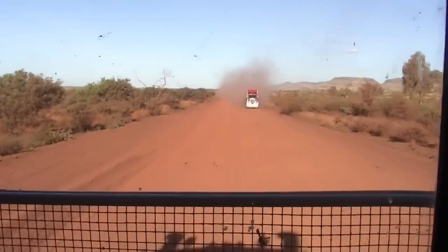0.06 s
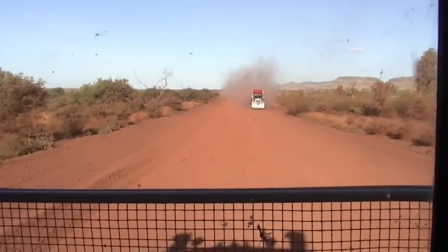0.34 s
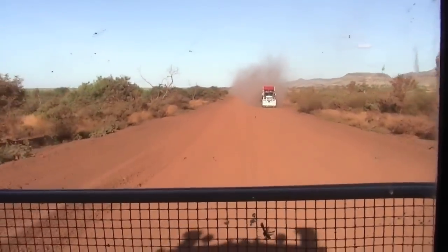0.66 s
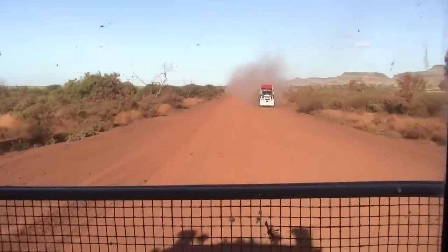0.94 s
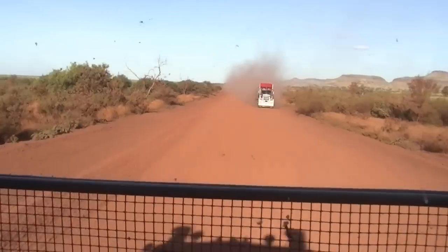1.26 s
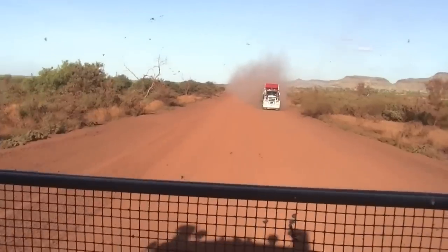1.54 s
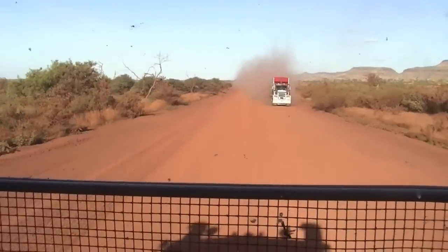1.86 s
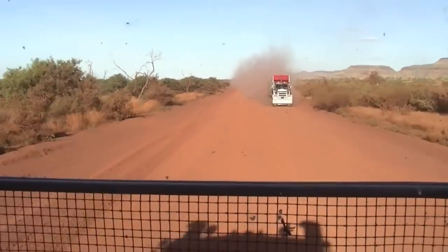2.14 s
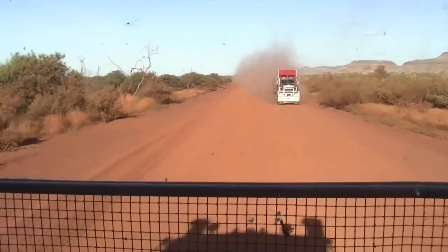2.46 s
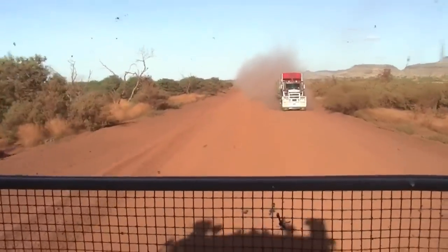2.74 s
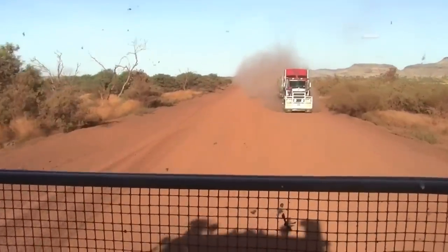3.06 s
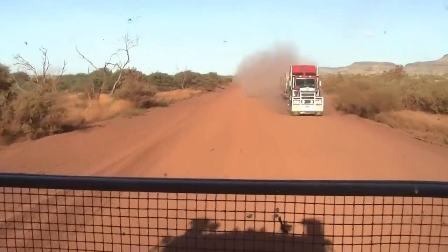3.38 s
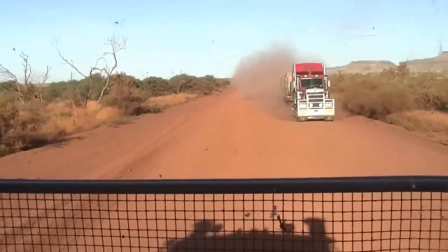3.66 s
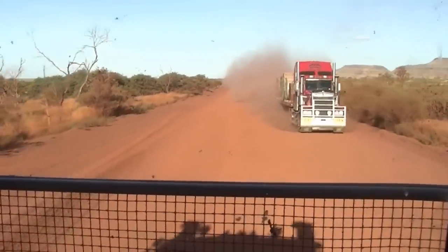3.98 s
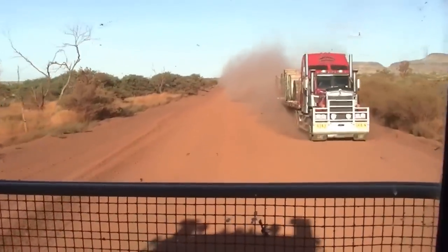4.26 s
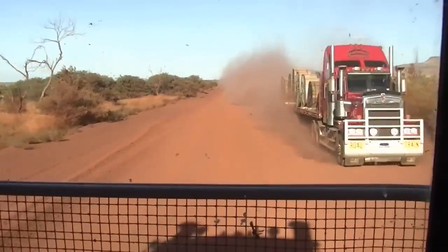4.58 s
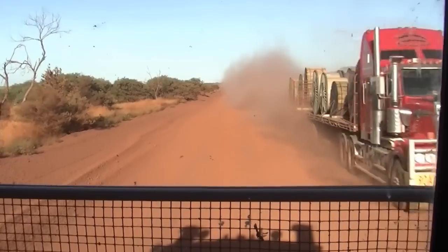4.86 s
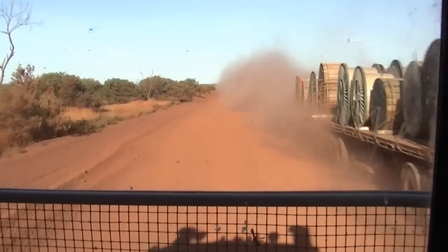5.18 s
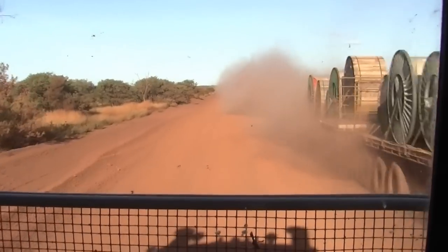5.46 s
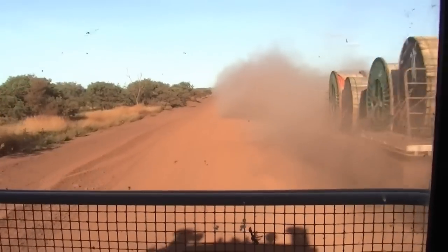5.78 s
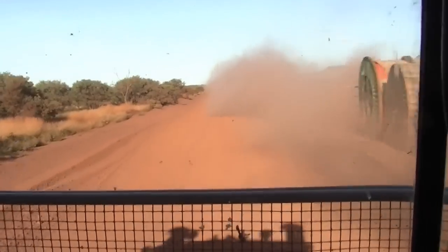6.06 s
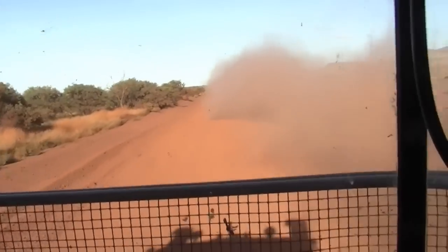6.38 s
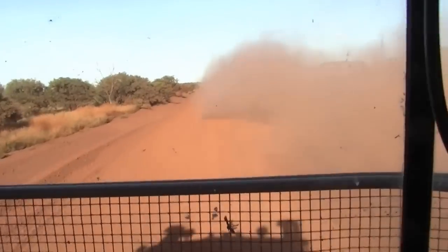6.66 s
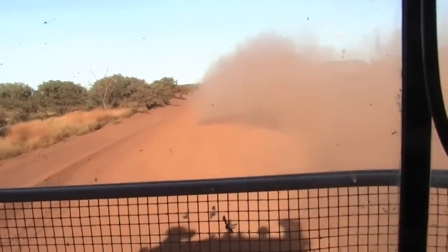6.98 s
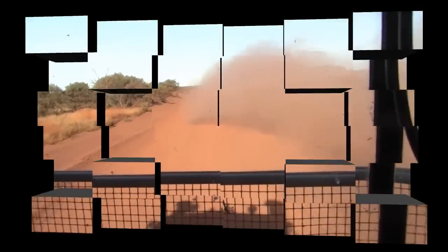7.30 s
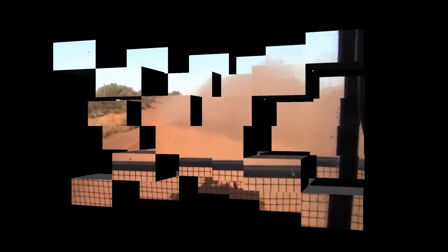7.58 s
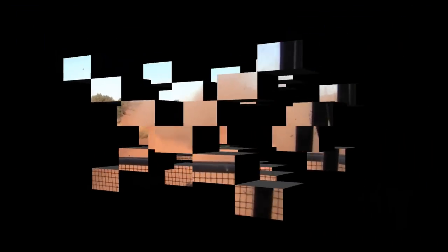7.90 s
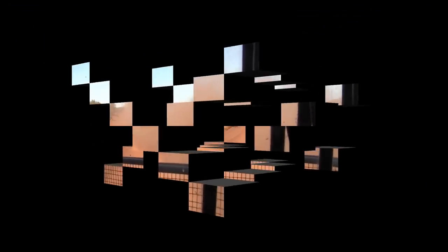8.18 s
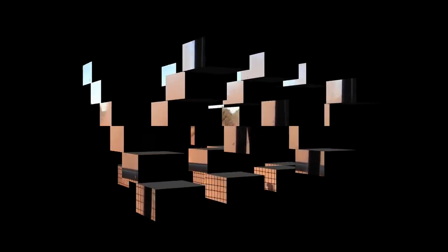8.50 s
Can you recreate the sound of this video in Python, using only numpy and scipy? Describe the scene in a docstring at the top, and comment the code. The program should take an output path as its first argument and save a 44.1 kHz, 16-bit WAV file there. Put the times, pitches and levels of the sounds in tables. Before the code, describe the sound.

Inside a diesel four-wheel drive on a dirt road, engine and tyres drone as a big truck passes with a muffled roar.

```python
"""Inside a diesel four-wheel drive cruising on a dirt road, as a road train passes the other way.
The engine drones in orders of the crankshaft speed, its turbo whistles faintly, and the tyres rumble
and hiss through the cabin's resonances. Loose fittings chatter on the corrugations and a few stones
ring the panels. The road train's muffled roar builds and holds, booming as the trailers draw
alongside in a wake of grit. At the end everything fades down."""
import sys
import numpy as np
from scipy import signal
from scipy.fft import rfft, irfft, next_fast_len
from scipy.io import wavfile

SR = 44100
rng = np.random.default_rng(int(sys.argv[2]) if len(sys.argv) > 2 else 0)


def store_wav(level_fs):
    """Save 16-bit WAV to argv[1]."""
    pcm = np.round(np.clip(np.atleast_2d(level_fs), -1, 1) * 32767)
    wavfile.write(sys.argv[1], SR, pcm.T.astype(np.int16))


N = 376598
TIME = np.arange(N) / SR
DEEPEST_S, DEEP_LENGTH_S = 7.15, 1.2  # where the washboard ridges are deepest, and for how long


def amp(db):
    """Decibels to gain."""
    return 10 ** (np.asarray(db) / 20)


def unit(x):
    """Scales to rms 1."""
    return x / np.sqrt(np.mean(x ** 2) + 1e-20)


def ramp(start_s, length_s):
    """Rises straight from 0 to 1, then holds."""
    return np.clip((TIME - start_s) / length_s, 0, 1)


def hump(s, length_s):
    """A bell of height 1 around time s, length_s wide at half height."""
    return .5 ** ((2 * (TIME - s) / length_s) ** 2)


def humps(rows):
    """A level ride in dB from rows of t/s, length/s, level/dB."""
    return sum(db * hump(s, length_s) for s, length_s, db in rows)


def wander(rate_hz):
    """Smooth random motion of rms 1, up to about the given rate."""
    hz = np.fft.rfftfreq(N, 1 / SR)[:2048]
    real, imag = rng.standard_normal((2, len(hz))) * np.exp(-.5 * (hz / rate_hz) ** 2) * (hz > 0)
    slow = unit(irfft(real + 1j * imag))
    return np.interp(TIME, np.linspace(0, TIME[-1], len(slow)), slow)


def curve(rows, hz, column=1):
    """One column of a frequency table, joined on a log axis."""
    rows = np.array(rows)
    return np.interp(np.log(hz + 1), np.log(rows[:, 0]), rows[:, column])


def equalise(x, rows):
    """Filters by rows of f/Hz, level/dB, keeping the power of white noise."""
    size = next_fast_len(x.shape[-1])
    gain = unit(amp(curve(rows, np.fft.rfftfreq(size, 1 / SR))))
    return irfft(rfft(x, size) * gain, size)[..., :x.shape[-1]]


def add(mix, s, sound):
    """Adds a stereo sound at time s."""
    part = mix[:, round(s * SR):][:, :sound.shape[1]]
    part += sound[:, :part.shape[1]]


# The cabin's resonances and nulls: f/Hz, width/Hz, level/dB
CABIN_MODES = [(209, 42, -6), (387, 21, 4), (433, 41, -1.5), (514, 70, 1.5), (767, 47, 4), (1008, 48, 4),
               (1268, 93, 3.5), (1350, 110, -3), (1707, 240, 3.5), (2060, 190, 1), (4700, 210, 2),
               (8900, 900, -0.4), (11950, 1550, -8.5)]
# Its stereo image: f/Hz, left-right correlation, left minus right/dB
CABIN_IMAGE = [(30, .45, -6), (70, 0.94, 5), (129, 0.99, -0.5), (445, 0.91, 2.7), (1100, 0.87, 0.1),
               (3700, 0.74, -1), (4700, 0.55, -2.3), (5900, 0.19, -1), (8700, .36, 0.5), (11500, .04, 0)]
def cabin_noise(spectrum, band_db=lambda hz: 0):
    """Outside noise coloured by the cabin: narrow in the bass, diffuse in the treble."""
    size = next_fast_len(N)
    hz = np.fft.rfftfreq(size, 1 / SR)
    modes_db = sum(db / (1 + (2 * (hz - centre) / width) ** 2) for centre, width, db in CABIN_MODES)
    density_db = curve(spectrum, hz) + modes_db + band_db(hz)
    balance_db = np.outer([.5, -.5], curve(CABIN_IMAGE, hz, column=2))
    alike = curve(CABIN_IMAGE, hz)
    left, other = rfft(rng.standard_normal((2, size)))
    pair = np.array([left, alike * left + np.sqrt(1 - alike ** 2) * other])
    pair *= amp(density_db + balance_db) / np.sqrt((1 + alike) / 2)
    return irfft(pair, size)[:, :N] * np.sqrt(SR / 2)


def jolts(hop_hz=14, uneven=.236, bump_hz=9):
    """A control signal: the wheels hop over corrugations, with random bumps on top."""
    rate_hz = hop_hz * (1 + uneven * wander(1.97))
    hop = np.sin(2 * np.pi * np.cumsum(rate_hz) / SR)
    return unit(hop + wander(bump_hz))


# Flares in the turbo's whistle: t/s, length/s, boost/dB
TURBO_FLARES = [(.67, 0.17, 8), (4.05, .55, 4.5), (4.95, 0.12, 8), (5.9, .2, 4), (7.03, 0.19, 6.5)]
def turbo(from_hz=6950, to_hz=7208, spool_s=.86, whistle_db=-62, swell_db=.5, flutter_db=3):
    """The turbo spools up and holds a thin, fluttering whistle, a little to the left."""
    hz = from_hz + (to_hz - from_hz) * np.tanh(TIME / spool_s) + 9 * wander(30)
    whistle = np.sqrt(2) * np.sin(2 * np.pi * np.cumsum(hz) / SR)
    level_db = whistle_db + humps(TURBO_FLARES) + swell_db * wander(3) + flutter_db * wander(15)
    return whistle * amp(level_db + np.array([[2], [-2]]))


# Tone of grit on body and glass: f/Hz, level/dB
GRIT_EQ = [(1200, 8), (2800, 4), (4300, 3), (5500, -1), (6700, 3), (8000, -6), (9000, -13), (12000, -14)]
def grit(grains_per_s=170, spread_db=8.5, decay_s=.0037, spots=6, clear_db=-53, wake_db=-46.5):
    """Grains tick on a few spots of bonnet and glass, louder once the trailers' wake arrives."""
    t, patter = np.arange(SR // 50) / SR, np.zeros((2, N))
    for _ in range(spots):
        force = amp(spread_db * np.minimum(rng.exponential(1, N), 3))
        grains = force * (rng.random(N) < grains_per_s / spots / SR)
        wide, centred = rng.standard_normal((2, len(t))), rng.standard_normal(len(t))
        tick = (wide + centred) * np.exp(-t / decay_s)
        patter += signal.oaconvolve(grains[None], tick, axes=1)[:, :N]
    wake = ramp(start_s=5, length_s=.7)
    return unit(equalise(patter, GRIT_EQ)) * amp(clear_db + (wake_db - clear_db) * wake)


# Bright tone of a loose fitting: f/Hz, level/dB
FITTING_EQ = [(1500, -20), (3000, -4), (5200, -6), (6600, -1), (7800, -5), (8900, 2), (9900, -6),
              (12000, -8)]
def fitting_buzz(decay_s=.011, roughness=.37):
    """One jump of a loose fitting: a dying run of tiny contacts."""
    t = np.arange(SR // 10) / SR
    steps = np.repeat(rng.standard_normal(len(t)), 32)[:len(t)]  # 32 samples to a contact
    contacts = np.exp(roughness * steps) * rng.standard_normal((2, len(t)))
    return unit(equalise(contacts, FITTING_EQ)) * np.exp(-t / decay_s)


# Single hard jumps of a fitting: t/s, level/dB
HARD_JUMPS = [(1.1444, -37), (1.762, -37), (3.79, -39), (5.5808, -36), (7.445, -34), (7.5194, -35),
              (7.8477, -36)]
def fittings(jolt, chatter_db=-50, chatter_per_s=40, spread_db=2, jolt_db=1.5, count=4):
    """Loose fittings rattle: hard accents over a light chatter that swells with the jolts."""
    accents, chatter = np.zeros((2, 2, N))
    for s, db in HARD_JUMPS:
        add(accents, s, amp(db) * fitting_buzz())
    for _ in range(count):
        force = amp(spread_db * rng.uniform(-.92, 1, N) + jolt_db * jolt)
        jumps = force * (rng.random(N) < chatter_per_s / count / SR)
        chatter += signal.oaconvolve(jumps[None], fitting_buzz(), axes=1)[:, :N]
    return accents + unit(chatter) * amp(chatter_db)


def washboard(start_s=6.209, ridge_s=.0688, scatter_s=.0036, ridges=26, shallow_db=-40, deep_db=-38):
    """A loose fitting jumps once on every ridge, harder where the ridges are deep."""
    rattle = np.zeros((2, N))
    level_db = shallow_db + (deep_db - shallow_db) * hump(DEEPEST_S, DEEP_LENGTH_S)
    for ridge, late in enumerate(rng.standard_normal(ridges)):
        s = start_s + ridge * ridge_s + scatter_s * late
        add(rattle, s, amp(np.interp(s, TIME, level_db)) * fitting_buzz())
    return rattle


# Modes of a struck body panel: f/Hz, level/dB, t60/s
PANEL_MODES = [(700, -10, .02), (1300, -6, .025), (1750, -4, .025), (2100, -1, .03), (2480, -2, .025),
               (2800, -1, .02), (3250, -4, .02), (3650, -3, .02), (3980, -2, .025), (5600, -12, .015),
               (8900, -17, .02)]
# Stone hits (small stones ring higher): t/s, level/dB, crack trim/dB, ring tilt/(dB per octave)
STONE_HITS = [(3.4465, -15, 3.5, -3.5), (6.2513, -24, 0, -4), (7.1695, -14.7, -7, 1), (8.3625, -21, -3, 1)]
def stones():
    """Each stone makes a wide crack and a brief, centred ring in a panel."""
    t, hits = np.arange(SR // 10) / SR, np.zeros((2, N))
    burst = .4 * np.exp(-t / .002) + .13 * np.exp(-t / .014)  # snap, then scatter round the cabin
    for s, db, crack_db, tilt in STONE_HITS:
        ring = np.zeros(len(t))
        for hz, mode_db, t60 in PANEL_MODES:
            struck_db = mode_db + tilt * np.log2(hz / 2800) - 7
            ring += amp(struck_db - 60 * t / t60) * np.sin(2 * np.pi * (hz * t + rng.random()))
        crack = amp(crack_db) * burst * equalise(rng.standard_normal((2, len(t))), PANEL_MODES)
        add(hits, s, amp(db) * (ring + crack))
    return hits


# Tyre and wind bed, ahead of the cabin's colour: f/Hz, density/dB
TYRE_SPECTRUM = [(12, -65.8), (35, -57), (70, -45.5), (110, -43), (170, -46), (210, -45.5), (340, -44.5),
                 (460, -55), (1050, -59.5), (1400, -67), (3500, -74), (5500, -81.5), (9000, -86),
                 (11000, -87.5)]
# Rough (+) and smooth (-) patches of road: t/s, length/s, level change/dB
ROAD_PATCHES = [(.2, 0.51, -1.5), (.63, 0.099, 0.9), (.81, 0.12, -2.5), (.95, 0.14, 1.5), (3.2, 0.54, .8),
                (4.2, 0.56, 1.3), (4.88, 0.2, 1), (5.22, 0.33, -0.8), (6.4, .6, -1)]
def tyres(jolt, split_hz=1400):
    """Tyre rumble and gravel hiss swell with each jolt, on rough patches and over deep washboard."""
    def crossover(power):
        return lambda hz: -10 * np.log10(1 + ((hz + 1) / split_hz) ** power)
    rumble = cabin_noise(TYRE_SPECTRUM, crossover(4))  # low side
    hiss = cabin_noise(TYRE_SPECTRUM, crossover(-4))  # high side
    depth = hump(DEEPEST_S, DEEP_LENGTH_S)
    rumble_db = -1 + 2 * depth + .76 * jolt
    hiss_db = -1.07 + depth + .82 * jolt
    return amp(humps(ROAD_PATCHES)) * (rumble * amp(rumble_db) + hiss * amp(hiss_db))


# The road train's roar through the glass, ahead of cabin colour and level ride: f/Hz, density/dB
ROAR_SPECTRUM = [(30, -77), (120, -69), (220, -63.5), (365, -44), (460, -59), (1000, -69), (2000, -75.5),
                 (6000, -102)]
def road_train(far_db=-20, close_db=-2.7, boom_db=4.5):
    """The roar grows as the road train nears, then holds, booming while the trailers are alongside."""
    nearness = ramp(start_s=1.76, length_s=1.6)
    alongside = hump(s=5.7, length_s=.35)
    return cabin_noise(ROAR_SPECTRUM) * amp(far_db + (close_db - far_db) * nearness + boom_db * alongside)


# Partials of the engine drone: multiple of crankshaft speed (4 is the firing rate), relative level/dB
ENGINE_ORDERS = [(1, -36), (2, -36.5), (2.5, -36.5), (3, -31), (4, -22.0), (4.5, -27.5), (5, -32),
                 (5.5, -27.0), (6, -29.5), (6.5, -27.5), (7, -30.5), (8, -33), (8.5, -47), (9, -35),
                 (10, -36.5), (10.5, -38), (11, -42.5), (12, -38.5), (13, -31.5), (14, -35.5),
                 (14.5, -35.5), (15, -38.5), (19.5, -43), (22, -43.5)]
def engine(crank_hz=27.31, sag_hz_per_s=.077, waver=.23, waver_hz=4, trim_db=-.44, pan_db=.7,
           ease_s=6.4, ease_db_per_s=-1):
    """Wavering orders of a gradually slowing crankshaft; unequal cylinders give the half orders."""
    turns = np.cumsum(crank_hz - sag_hz_per_s * TIME) / SR
    drone, side = np.zeros((2, N)), np.array([[1], [-1]])
    for order, db in ENGINE_ORDERS:
        tone = np.exp(2j * np.pi * (order * turns + rng.random()))
        tone *= 1 + waver * (wander(waver_hz) + 1j * wander(waver_hz))
        skew_rad = .14 * side * rng.choice([-1, 1])  # standing waves put left and right out of step
        drone += amp(db) * (tone * np.exp(1j * skew_rad)).real
    ease_db = ease_db_per_s * np.maximum(TIME - ease_s, 0)  # the driver eases off after the trailers
    return np.sqrt(2) * drone * amp(trim_db + ease_db + pan_db * side)


def scene():
    """The cabin mix; the same jolts drive the tyres and the fittings."""
    jolt = jolts()
    return (engine() + turbo() + tyres(jolt) + road_train()
            + grit() + stones() + fittings(jolt) + washboard())


def record(dry, cutoff_hz=12100):
    """A straight closing fade that ends short of silence, then a steep high cut."""
    fade = 1 - ramp(start_s=7.46, length_s=1.69)
    lowpass = signal.firwin(511, cutoff_hz, window=("kaiser", 9), fs=SR)
    return signal.oaconvolve(dry * fade, lowpass[None], "same")


dry = scene()
out = record(dry)
store_wav(out)
```